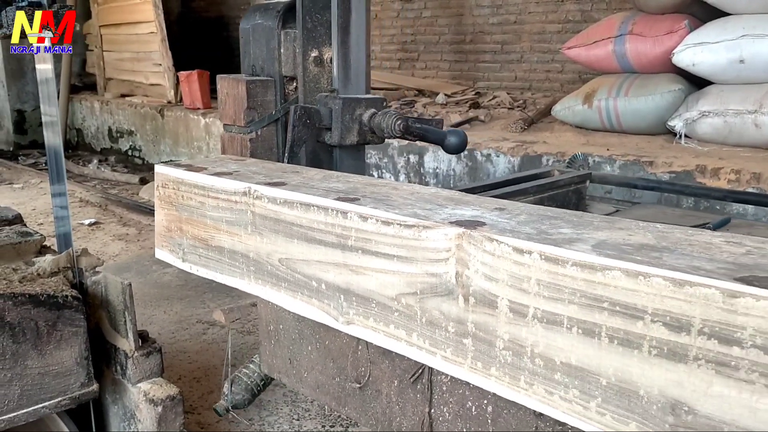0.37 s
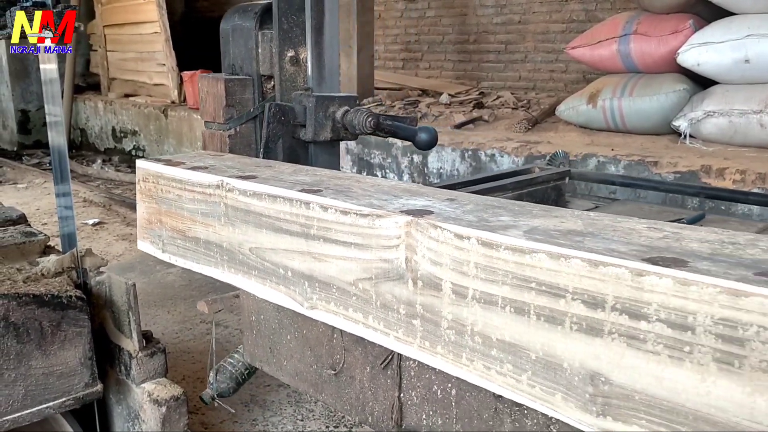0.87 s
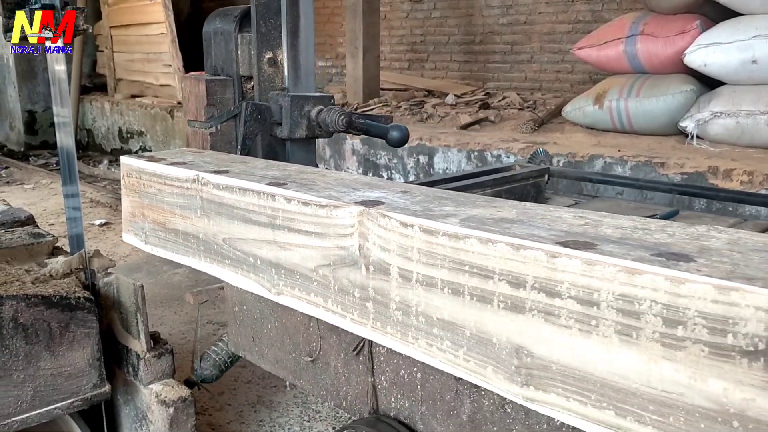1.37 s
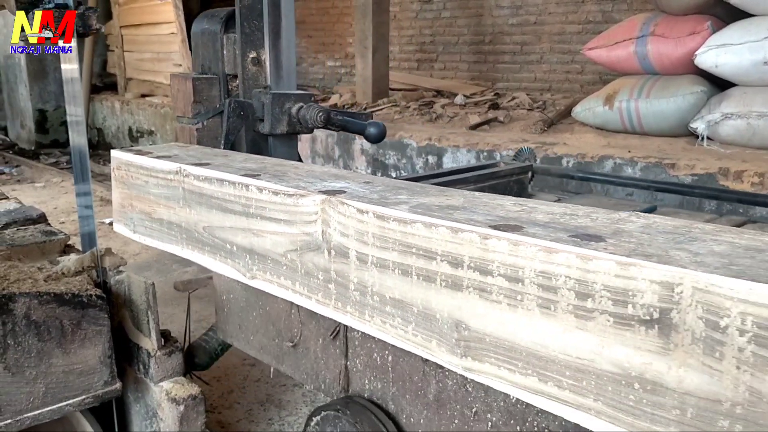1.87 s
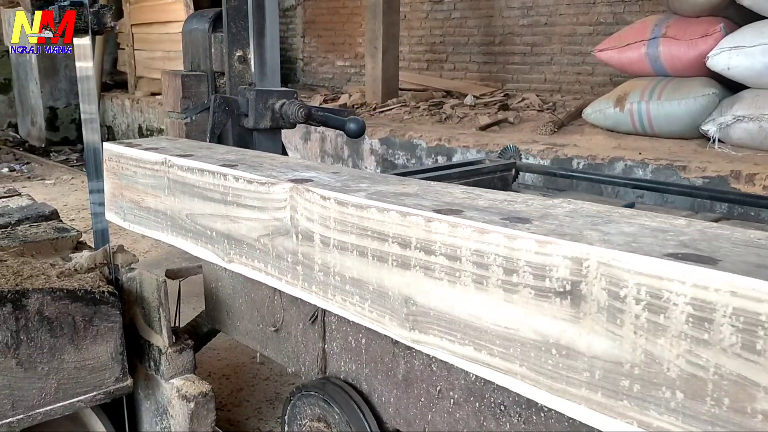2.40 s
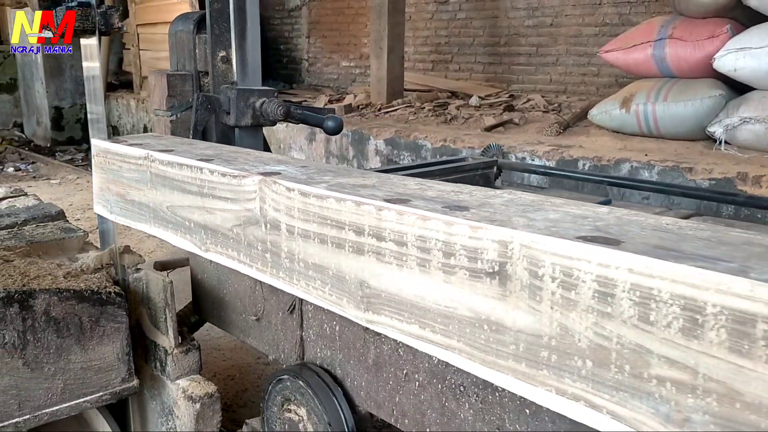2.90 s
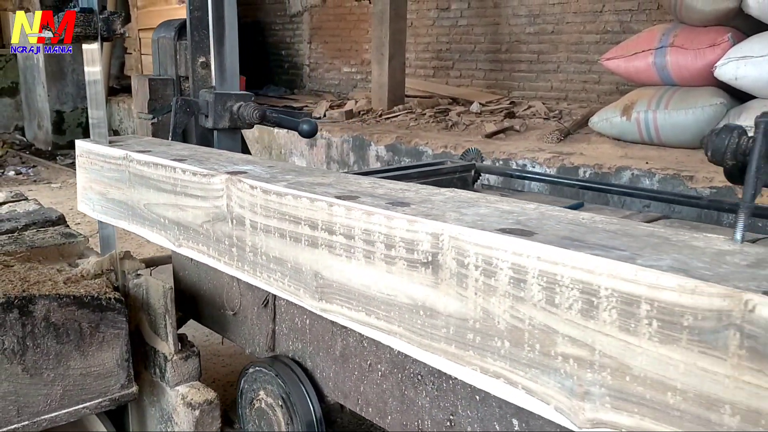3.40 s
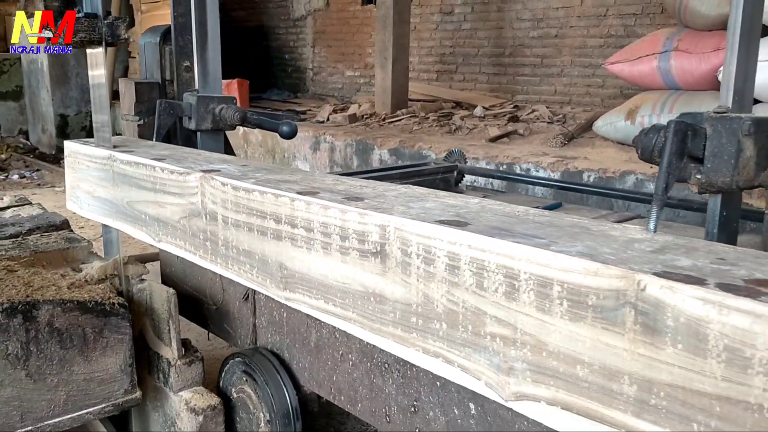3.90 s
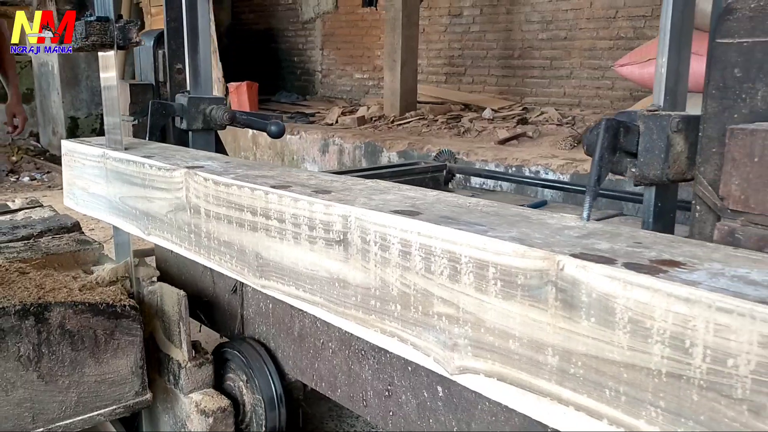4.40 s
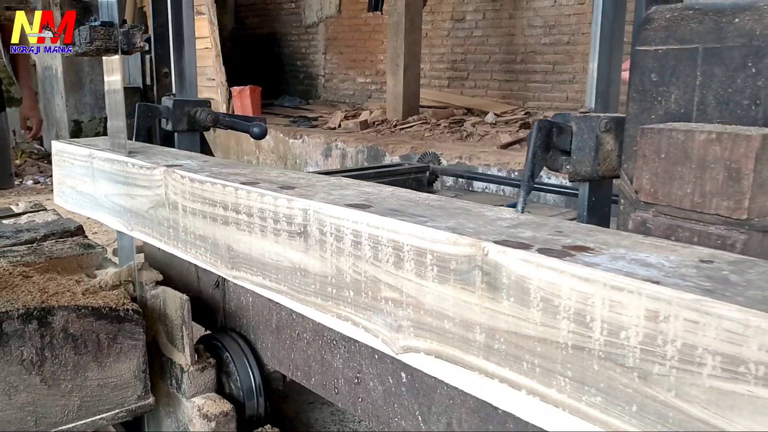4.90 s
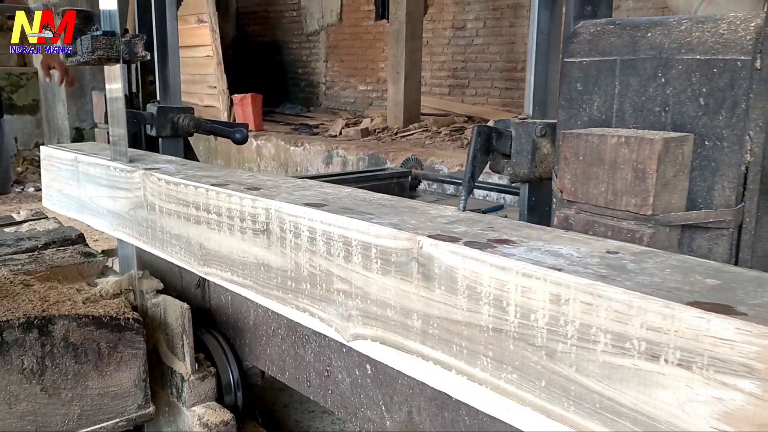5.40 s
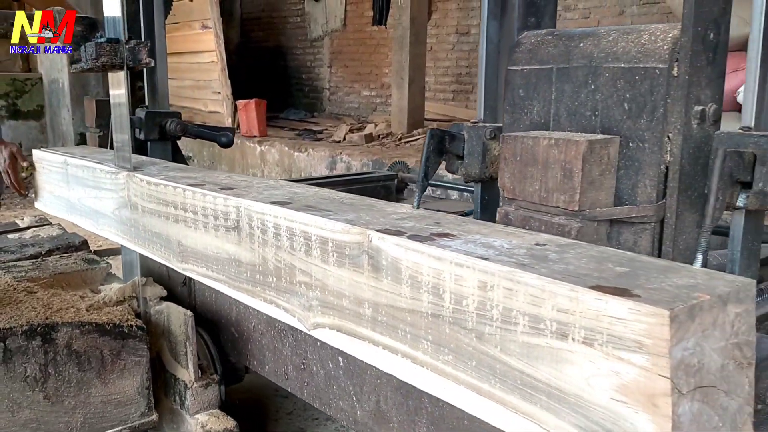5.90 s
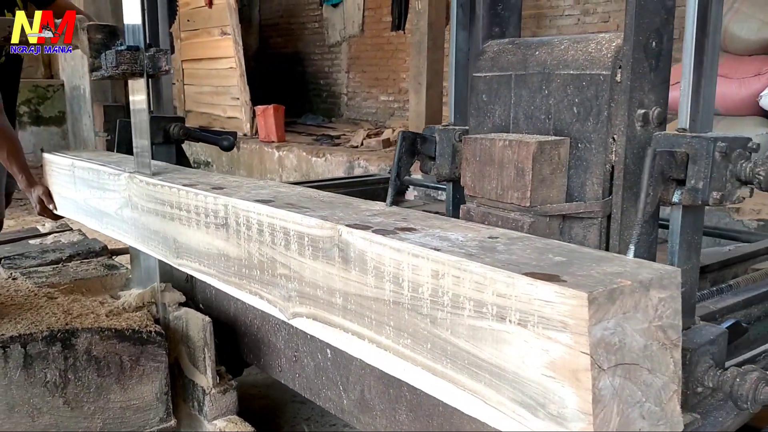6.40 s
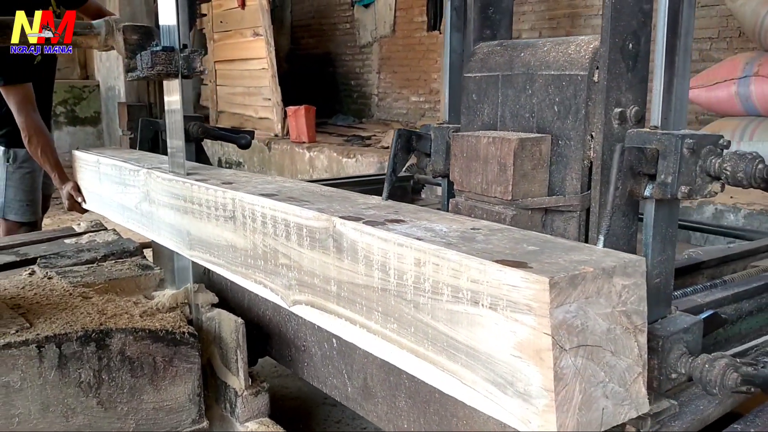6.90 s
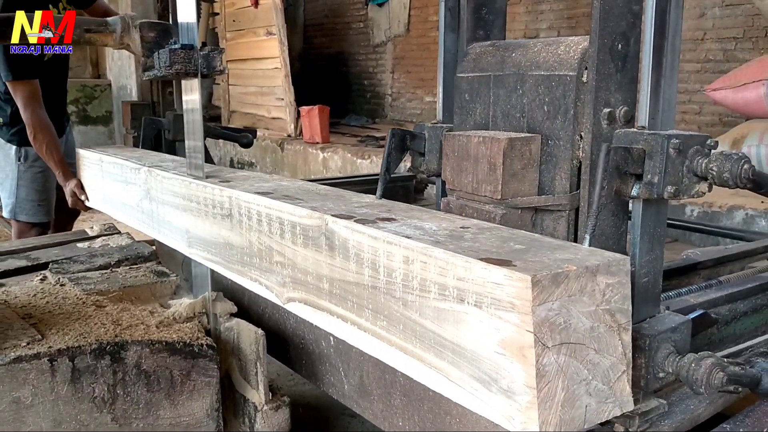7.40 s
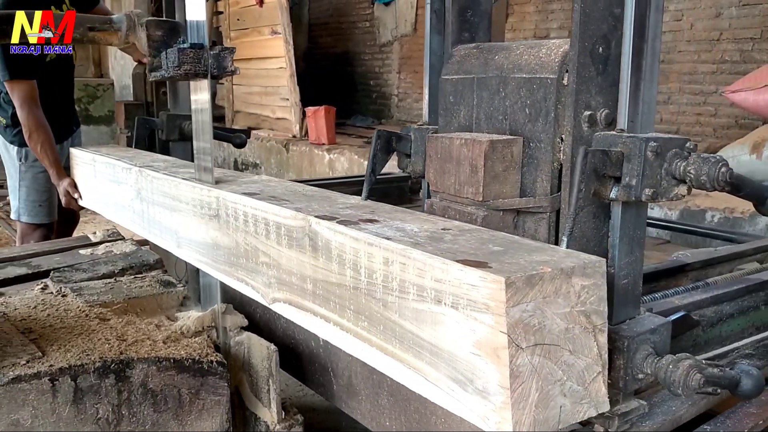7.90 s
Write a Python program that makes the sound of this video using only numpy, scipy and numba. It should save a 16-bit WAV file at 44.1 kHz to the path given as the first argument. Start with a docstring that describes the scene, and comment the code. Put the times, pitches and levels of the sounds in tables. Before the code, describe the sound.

In an open shed, a band saw's airy ringing rush gives way after a few seconds to continuous sizzling, raspy cutting through a log.

```python
"""In an open shed, one microphone a few metres from a band saw; its sound peaks strongly near 15 kHz.
The saw runs free: hiss from rubbing wheels and guides, and from air, makes blade and frame ring near 2 kHz.
At 2.6 s the timber meets the blade: noise scrapes repeat from tooth to tooth, about 630 a second,
chips hiss high up after each tooth, and the running sound drops about 4 dB once the cut begins.
Behind it, coloured noise makes the rumble of carriage and shed, and wavering sines the motor tones."""
import sys
import numpy as np
from scipy import signal
from scipy.fft import rfft, irfft, next_fast_len
from scipy.io import wavfile
from scipy.ndimage import uniform_filter1d, map_coordinates
from numba import njit

SR = 44100
rng = np.random.default_rng(int(sys.argv[2]) if len(sys.argv) > 2 else 0)


def volts(x):
    """Linear amplitude factor 10**(x/20) for a level x in dB, scalar or array-like."""
    e = np.asarray(x, float) / 20
    return 10 ** e


def wav_record(signal):
    """Record a signal, one row per channel, as 16-bit PCM in the file named by sys.argv[1]."""
    frames = np.transpose(np.atleast_2d(signal))
    bounded = np.clip(frames, -1, 1)
    # unit amplitude maps onto the largest positive 16-bit level
    quanta = np.round(bounded * 32767).astype(np.int16)
    wavfile.write(sys.argv[1], SR, quanta)


N = 354123
TIME = np.arange(N) / SR
SIZE = next_fast_len(N)
FREQ = np.arange(SIZE // 2 + 1) * SR / SIZE
# the timber meets the blade: start and rise of the contact [s]
TOUCH_S, TOUCH_RISE_S = 2.615, 0.02

# rumble of carriage and shed: (time [s], level [dB], level of the deepest part [dB])
RUMBLE_LEVEL = [(0, -44.5, -49), (1.0, -47.5, -54), (2.4, -45.5, -52), (2.78, -41.5, -45), (3.0, -46, -52),
                (3.45, -42.5, -50), (3.65, -46.5, -50), (4.5, -43.5, -47.5), (4.65, -47, -49),
                (4.87, -42.5, -47), (5.1, -44.5, -49), (5.68, -46, -48), (5.85, -42, -45),
                (6.05, -44.5, -50), (6.5, -43.5, -44), (6.7, -45, -50), (7.45, -44.5, -47.5),
                (8.03, -45, -47)]
# relative spectrum of the rumble: (frequency [Hz], density [dB per Hz])
RUMBLE_SPECTRUM = [(59, -39), (100, -2.5), (258, -1.5), (323, 0.5), (414, -3), (500, -2.5), (650, -28),
                   (1100, -120)]
# relative spectrum of the deepest part: (frequency [Hz], density [dB per Hz])
DEEP_SPECTRUM = [(12, -13), (20, 5), (50, -1.5), (90, -3.5), (130, -25), (300, -90)]
# motor tones before the cut: (frequency [Hz], middle level [dB])
MOTOR_TONES = [(592.2, -52.5), (683.7, -49), (888.2, -48)]
# relative spectrum of the running hiss, before resonances: (frequency [Hz], density [dB per Hz])
RUNNING_SPECTRUM = [(180, -64), (300, -23.5), (425, -19), (879, -12), (1110, -10.5), (1570, -8), (1850, -2),
                    (2040, -1.5), (2990, -9), (3520, -11.5), (4160, -11.5), (6180, -9.5), (9500, -23.5),
                    (13700, -16.5), (15600, -10.5)]
# blade and frame resonances, notches where negative:
# (frequency [Hz], width [Hz], gain over the hiss when free [dB], gain during the cut [dB])
RESONANCES = [(670, 36, 4, 4), (800, 87, 1.5, 3.5), (1517, 42, 6, 5), (1610, 71, 8, 7.5),
              (1900, 48, -8, -4.5), (2080, 40, 6.5, -1.5), (2220, 49, 4.5, 6), (2309, 58, 9, 4.5),
              (2460, 20, 8, 7), (2573, 35, 6.5, 5.5), (2692, 20, 9.5, 5.5), (3162, 12, 7, 4),
              (4120, 350, 6.5, 4.5), (4568, 170, 4.5, 4), (5420, 140, 3, 1), (330, 16, 10.5, 0),
              (590, 20, 2, 5.5), (3690, 230, -1.5, -1), (4910, 200, -0.5, -2.5), (6000, 230, 2, 1),
              (7560, 850, 4, 3.5), (12700, 500, 6.5, 4), (4358, 55, 0, -1.5), (3890, 40, -3, 4.5),
              (2780, 30, 4, 4)]
# strongest ring, before a 2 dB trim: (time [s], level [dB])
WHINE_LEVEL = [(0, -26.5), (.6, -26.5), (1.8, -24.5), (2.55, -26.5), (2.75, -31), (3.9, -28), (5.2, -32),
               (6.1, -32), (6.6, -29.5), (7.0, -28.5), (7.2, -36), (7.55, -27.5), (8.03, -38)]
# wandering pitch of that ring: (time [s], frequency [Hz])
WHINE_FREQUENCY = [(0, 2006), (1, 1985), (2.6, 2010), (4, 2013), (6, 2016), (7.05, 1985), (7.45, 1943),
                   (8.03, 1935)]
# the cut, common to ticks and chips: (time [s], level [dB])
CUT_LEVEL = [(2.63, -23), (2.95, -23.5), (4.2, -24.5), (4.4, -23.5), (5.6, -24.5), (6.65, -23), (6.9, -24),
             (7.52, -23), (8.03, -25)]
# relative spectrum of the tooth ticks: (frequency [Hz], density [dB per Hz])
TICK_SPECTRUM = [(600, -13.5), (1250, -10.5), (2500, -12), (4400, -9), (6300, -11), (7600, -11.5),
                 (8600, -17.5), (9500, -18.5), (11000, -15.5), (12000, -9), (12600, -1.5), (14400, 2),
                 (15600, -3)]
# relative spectrum of the chip spray: (frequency [Hz], density [dB per Hz])
CHIP_SPECTRUM = [(300, -22.5), (1000, -9), (3000, -24.5), (7000, -9), (9500, -31), (11500, -14.5),
                 (12600, -5), (14300, 1), (15500, -1.5)]
# brief dips and swells of the whole sound: (start [s], length [s], change [dB])
LEVEL_CHANGES = [(.02, .08, -1), (0.144, 0.054, 1), (.66, 0.071, -1.5), (1.02, 0.12, -1), (1.133, .07, 0.7),
                 (1.236, .08, -1.3), (1.358, 0.054, -1), (1.818, 0.096, 0.9), (2.85, .06, -1.5),
                 (3.153, 0.23, -1), (3.436, 0.058, 0.5), (3.56, 0.2, -2), (3.944, 0.26, -0.5),
                 (4.48, 0.051, 2), (4.85, 0.18, 1.3), (5.053, 0.087, -1.5), (6.57, 0.093, 0.9),
                 (7.065, 0.11, -2), (7.237, .1, -2.5)]


def curve(table):
    """Interpolates the columns of a table over time."""
    seconds, *columns = np.transpose(table)
    return [np.interp(TIME, seconds, column) for column in columns]


def colour(table):
    """Gain per frequency, from spectrum points joined on a log frequency axis."""
    hz, db = np.transpose(table)
    return volts(np.interp(np.log(FREQ + 1), np.log(hz), db))


def shape(x, gain, lo_hz, hi_hz):
    """Spectrum of x coloured by gain, scaled to rms 1 between lo_hz and hi_hz."""
    spec = rfft(x, SIZE) * gain
    band = (FREQ > lo_hz) & (FREQ < hi_hz)
    return spec * SIZE / np.sqrt(2 * np.sum(np.abs(spec[band]) ** 2))


def waveform(spec):
    """Turns a spectrum back into sound."""
    return irfft(spec, SIZE)[:N]


def walk(rate):
    """Random levels, rate per second, smoothed twice and scaled to spread 1."""
    hold = int(SR / rate)
    steps = np.repeat(rng.standard_normal(N // hold + 1), hold)
    wander = uniform_filter1d(uniform_filter1d(steps, hold), hold)[:N]
    return wander / wander.std()


def flicker(spec, own_db, shared_db, rate):
    """Half-octave bands whose levels flicker, partly alone, partly together."""
    out = np.zeros(N)
    shared = shared_db * walk(rate)
    place = 2 * np.log2(FREQ / 20 + 1e-9)  # half octaves above 20 Hz
    for k in range(21):
        part = np.cos(np.pi / 2 * np.clip(place - k, -1, 1)) ** 2
        # skip bands that are next to silent
        if np.abs(spec * part).max() > 1e-4 * np.abs(spec).max():
            out += waveform(spec * part) * volts(shared + own_db * walk(rate))
    return out


@njit
def ring(x, hz, width):
    """A resonance, width in Hz, whose pitch may move every sample."""
    y, z = np.empty(len(x)), 0j
    for i in range(len(x)):
        z = z * np.exp((2j * hz[i] - width) * np.pi / SR) + x[i]
        y[i] = z.imag
    return y


def contact():
    """0 while the blade runs free, rising to 1 as it enters the wood."""
    return np.clip((TIME - TOUCH_S) / TOUCH_RISE_S, 0, 1)


def ducked(free, cutting):
    """A value that slides from its free setting to its cutting one once the cut begins."""
    slide_s = 0.062
    return free + (cutting - free) * np.clip((TIME - TOUCH_S) / slide_s, 0, 1)


def rumble():
    """Carriage wheels, motor and shed as bass noise; the deepest part swells on its own."""
    level_db, deep_db = curve(RUMBLE_LEVEL)
    bass_spec = shape(rng.standard_normal(N), colour(RUMBLE_SPECTRUM), 90, 450)
    bass = flicker(bass_spec, own_db=0.5, shared_db=1.0, rate=6)
    deep = waveform(shape(rng.standard_normal(N), colour(DEEP_SPECTRUM), 13, 110))
    return volts(level_db) * bass + volts(deep_db) * deep


def motor_tones():
    """Thin sines, wavering in level and pitch, that sink once the cut begins."""
    cut_change_db = -14
    tones = np.zeros(N)
    for hz, db in MOTOR_TONES:
        level = np.sqrt(2) * volts(db + 3.3 * walk(6.1))
        turns = np.cumsum(hz * (1 + 0.00295 * walk(5))) / SR
        tones += level * np.sin(2 * np.pi * turns)
    return volts(cut_change_db * contact()) * tones


def resonant_gain(column):
    """Running spectrum times every resonance; the column picks the gains when free or during the cut."""
    gain = colour(RUNNING_SPECTRUM)
    for row in RESONANCES:
        hz, width = row[:2]
        gain = gain * (1 + (volts(row[column]) - 1) / (1 + (2 * (FREQ - hz) / width) ** 2))
    return gain


def running():
    """Rubbing and air hiss excite blade and frame; level and ring balance change once the cut begins."""
    upper_from_hz = 3100  # middle of the crossover
    noise = rng.standard_normal(N)
    free_gain, cut_gain = resonant_gain(2), resonant_gain(3)
    upper = np.clip((FREQ / upper_from_hz - 0.9) / 0.2, 0, 1)
    cut_share = uniform_filter1d(contact(), size=SR // 20)

    def blend(part, lo_hz, hi_hz):
        """Crossfades the free sound into that of the cut within one part of the spectrum."""
        free_sound = waveform(shape(noise, free_gain * part, lo_hz, hi_hz))
        cut_sound = waveform(shape(noise, cut_gain * part, lo_hz, hi_hz))
        return (1 - cut_share) * free_sound + cut_share * cut_sound

    low = blend(1 - upper, 1400, 2900)
    high = blend(upper, 3070, 8700)
    high = flicker(rfft(high, SIZE), own_db=0.8, shared_db=0.51, rate=30)
    balance = volts(-0.5) * low + volts(ducked(free=-2.5, cutting=-3)) * high
    return volts(ducked(free=-21, cutting=-25)) * balance


def whine():
    """The strongest ring: one narrow resonance of wandering pitch, driven by noise."""
    width_hz = 36.0
    y = ring(rng.standard_normal(N), curve(WHINE_FREQUENCY)[0], width_hz)
    return volts(curve(WHINE_LEVEL)[0] - 2) * y / y.std()


def teeth():
    """Each tooth scrapes out nearly the sound of the one before: a breathy stack on the tooth rate."""
    # the blade slows a little under load
    free_hz, loaded_hz, slowing_s = 636, 628.3, 0.3
    likeness = 0.81  # how much of one tooth's sound the next one repeats, 0-1
    points, partials = 128, 27  # points per tooth, audible partials of the tooth rate
    hz = loaded_hz + (free_hz - loaded_hz) * np.exp(-np.maximum(TIME - TOUCH_S, 0) / slowing_s)
    turns = np.cumsum(hz * (1 + 0.000695 * walk(12))) / SR  # teeth passed so far
    bite = 1 + 1.4 * np.exp(-np.arange(points) / points / 0.23)  # strongest as a tooth begins
    scrape = rng.standard_normal((int(turns[-1]) + 2, points)) * bite
    scrape = signal.lfilter([1], [1, -likeness], scrape, axis=0).ravel()
    # steep low-pass at the highest audible partial
    scrape = signal.sosfilt(signal.butter(12, 2 * partials / points, output="sos"), scrape)
    return map_coordinates(scrape, [turns * points], order=3), turns % 1


def cutting():
    """Tooth scrapes, and a noise spray of chips strongest just after each tooth begins."""
    tick_db, chip_db = -3, -3  # balance within the cut
    ticks, phase = teeth()
    chips = rng.standard_normal(N) * (1 + 0.36 * np.exp(-phase / 0.3))
    tick_spec = shape(ticks, colour(TICK_SPECTRUM), 11000, 14850)
    chip_spec = shape(chips, colour(CHIP_SPECTRUM), 12000, 15400)
    spec = volts(tick_db) * tick_spec + volts(chip_db) * chip_spec
    return contact() * volts(curve(CUT_LEVEL)[0]) * flicker(spec, own_db=0.0, shared_db=0.5, rate=40)


def unsteady():
    """Gain of the whole sound: set dips and swells over a faint random waver."""
    edge_s = 0.022
    change_db = np.zeros(N)
    for start, length, db in LEVEL_CHANGES:
        begun = np.clip((TIME - start) / edge_s + 0.5, 0, 1)
        ended = np.clip((TIME - start - length) / edge_s + 0.5, 0, 1)
        change_db += db * (begun - ended)
    return volts(change_db + 0.33 * walk(9))


def scene():
    """Background and saw at one microphone, which feeds both channels."""
    sound = rumble() + motor_tones() + running() + whine() + cutting()
    return np.tile(unsteady() * sound, (2, 1))


def roll_off(x):
    """The treble ends steeply here."""
    return signal.sosfilt(signal.butter(12, 16550, fs=SR, output="sos"), x)


def record(dry):
    """A steep elliptic low-pass removes everything above about 15.5 kHz."""
    top_hz = 15470
    steep = signal.ellip(16, 0.3, 90, top_hz, fs=SR, output="sos")
    mix = signal.sosfilt(steep, dry)
    return roll_off(mix)


dry = scene()
out = record(dry)
wav_record(out)
```